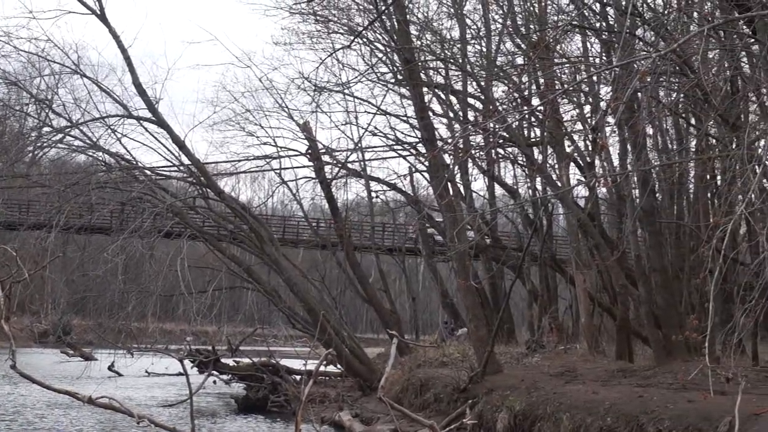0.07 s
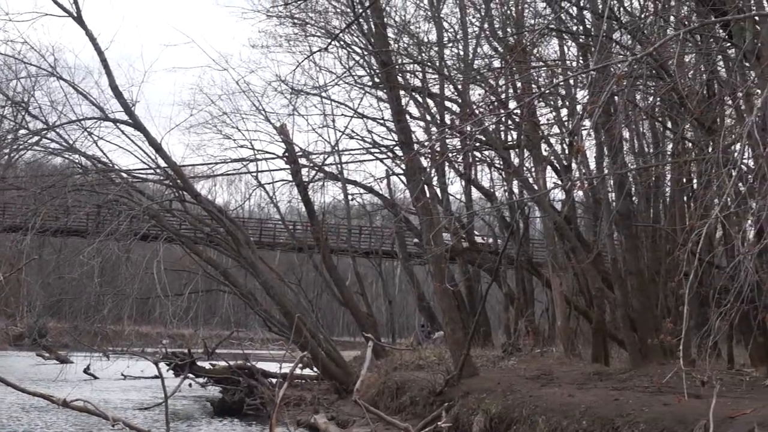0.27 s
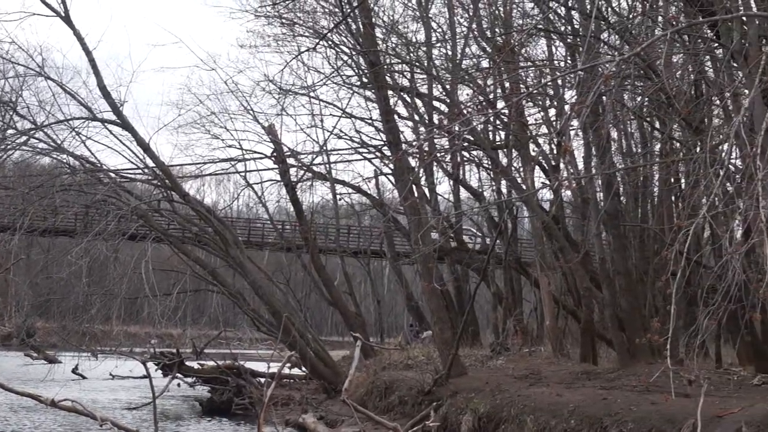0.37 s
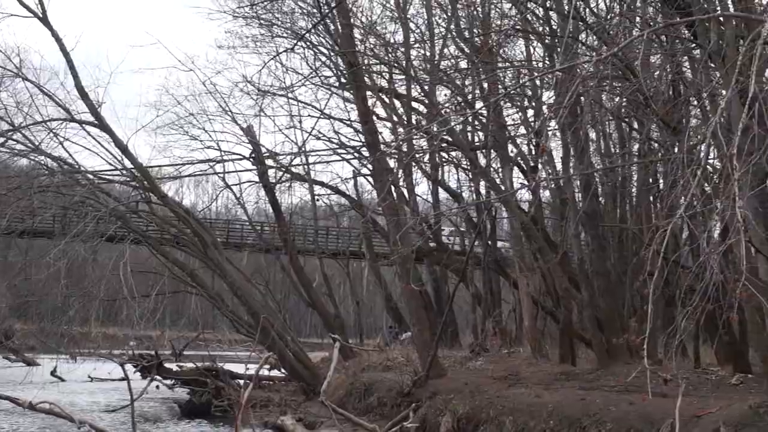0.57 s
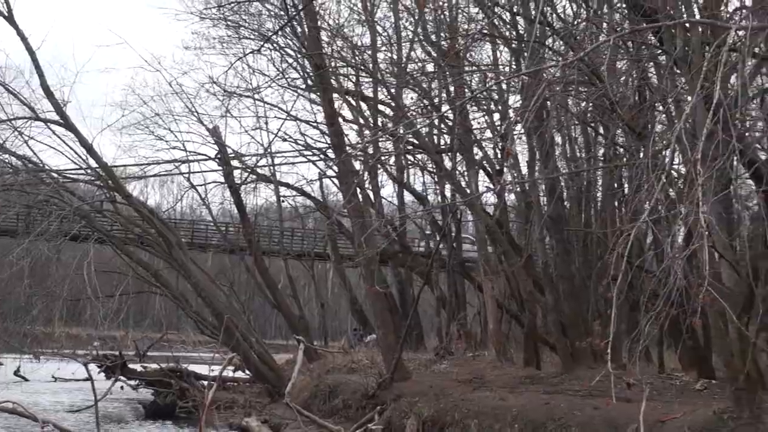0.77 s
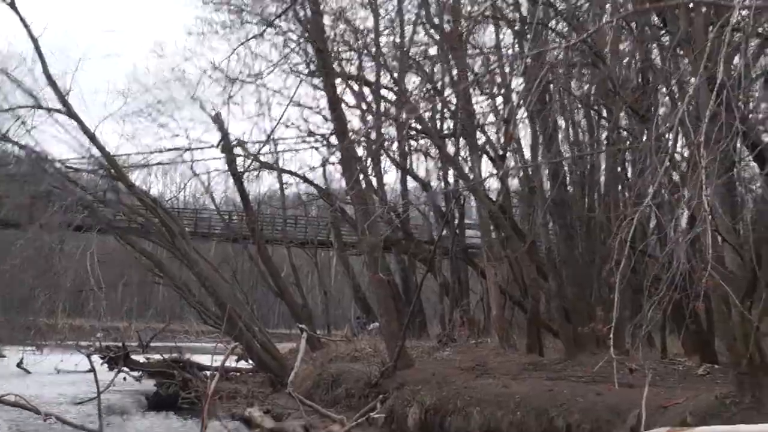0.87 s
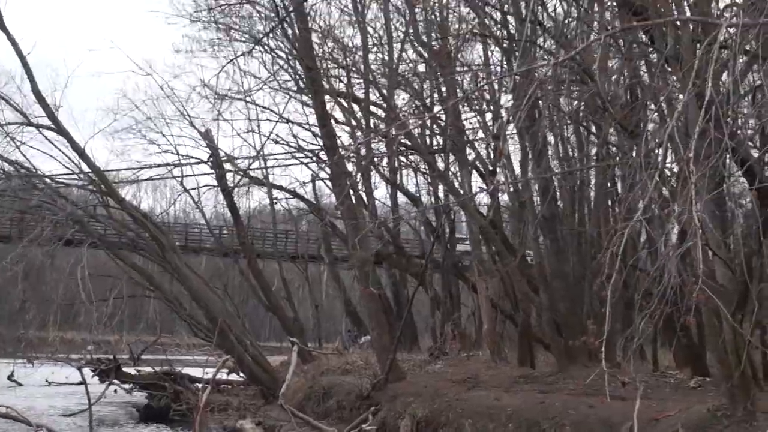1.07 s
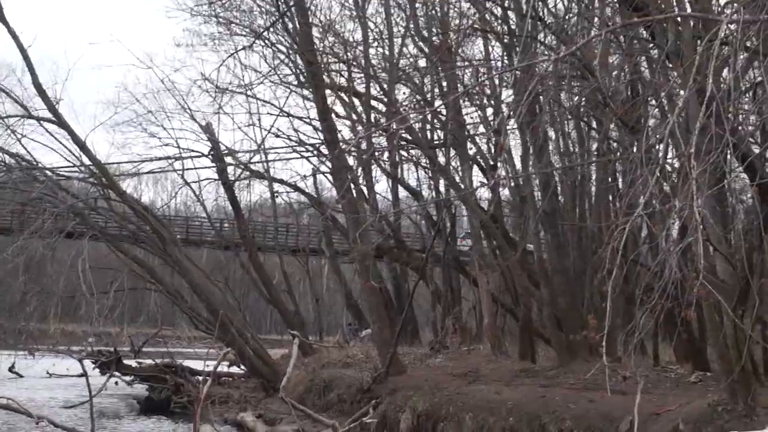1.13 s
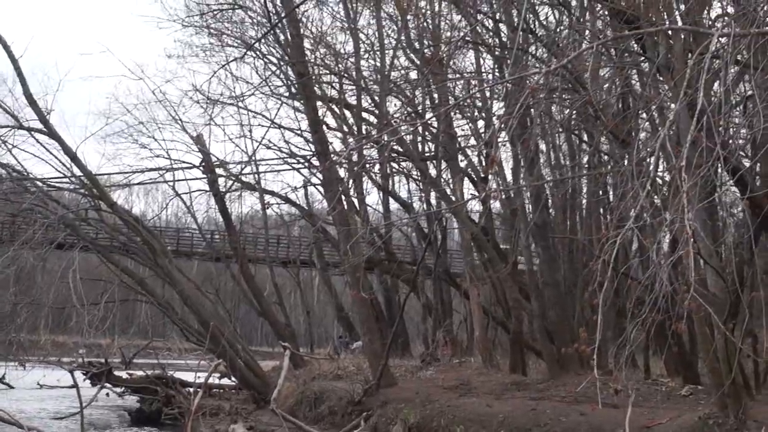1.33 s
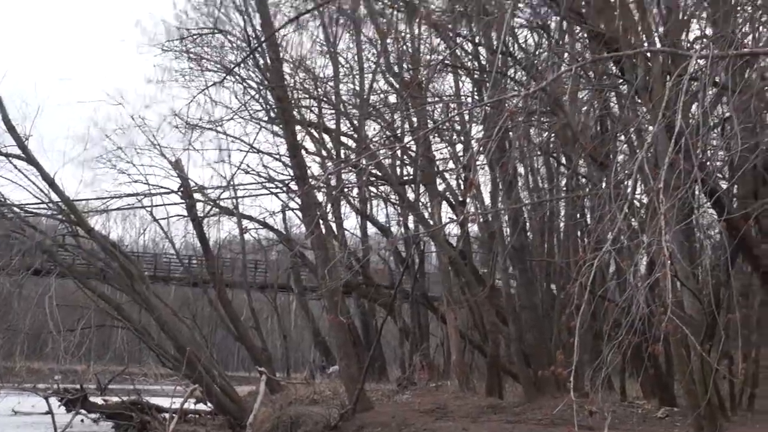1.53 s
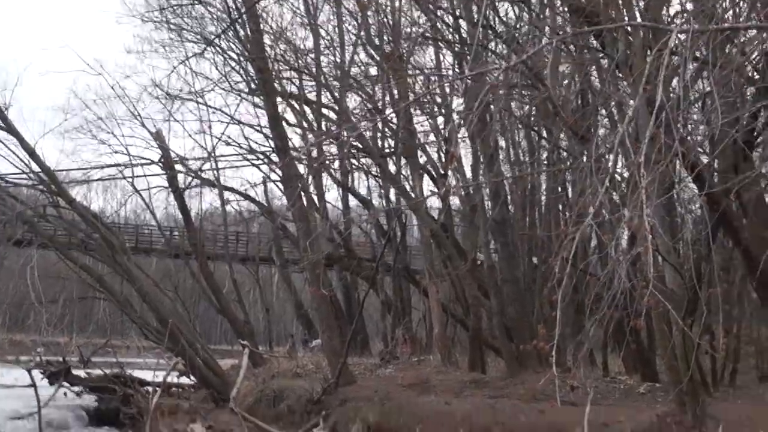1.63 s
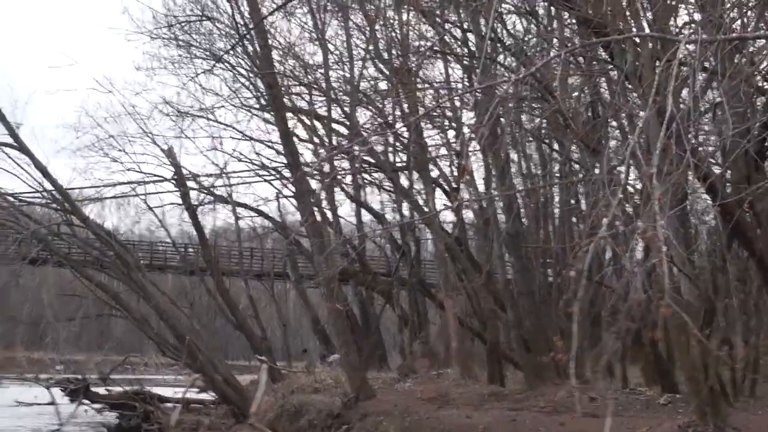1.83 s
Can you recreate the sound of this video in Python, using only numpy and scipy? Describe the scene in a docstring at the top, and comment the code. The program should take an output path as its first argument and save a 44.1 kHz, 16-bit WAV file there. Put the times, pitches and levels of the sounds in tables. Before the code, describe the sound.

Dry wood clacks and cracks at irregular moments on a river bank. A soft scraping rustle with a few dull scuffs swells between the knocks, while the river rushes faintly and steadily in the background.

```python
"""Dry wood clacks and knocks at irregular moments on a river bank near a footbridge.
Each impact gives a contact ping and a splintery crack, and excites damped normal modes:
the high ones ring briefly, the low ones of the body thump. Between the clacks a soft scraping
rustle swells, with a few dull scuffs. Behind them the river rushes as steady broadband noise."""
import sys
import numpy as np
from scipy import signal
from scipy.fft import rfft, irfft
from scipy.io import wavfile
from scipy.ndimage import uniform_filter1d

SR = 44100
rng = np.random.default_rng(int(sys.argv[2]) if len(sys.argv) > 2 else 0)


def dump(signal):
    """Clip the signal to [-1, 1] and save it as 16-bit WAV at the path in sys.argv[1]."""
    limited = np.clip(np.atleast_2d(signal).T, -1, 1)
    pcm = np.round(limited * 32767).astype(np.int16)
    wavfile.write(sys.argv[1], SR, pcm)


N = 83790

# Noise spectra of the background (f/Hz, relative spectral density/dB)
RIVER_SPECTRUM = [(30, -48), (60, -48), (100, -29), (160, -20), (250, -10.5), (370, -12.5), (480, -1),
                  (600, -2.5), (780, -6.5), (1030, -0.5), (1350, -8), (2000, -13), (3000, -19), (4500, -21),
                  (7000, -25.5), (11000, -31)]
RUSTLE_SPECTRUM = [(30, -64), (100, -47), (165, -35), (240, -27), (350, -20.5), (500, -4), (620, -4),
                   (780, -5.5), (1030, 0), (1300, -8.5), (1800, -12.5), (2300, -19.5), (3300, -24),
                   (5500, -43), (8400, -41), (11000, -54)]
GRIT_SPECTRUM = [(200, -15.5), (1200, 17), (2000, -13), (4000, -3), (7000, -20), (11000, -27)]
BUMP_SPECTRUM = [(30, -34), (60, -28), (120, -12), (240, 14), (400, -4), (1000, -45)]
HISS_SPECTRUM = [(400, -30), (1500, -3), (2500, -0.5), (4000, -3), (7000, -19), (11000, -26)]
# Noise independent in each channel, relative to noise common to both (f/Hz, level/dB)
RIVER_INCOHERENCE = [(50, 0), (200, -19), (500, -4), (1100, -19.5), (2200, 1), (4500, 12), (11000, 7)]
RUSTLE_INCOHERENCE = [(50, -4), (200, -14), (500, -18), (1100, -17), (2200, -11), (4500, 4), (11000, 4)]
# Amplitude envelopes (t/s, level/dB)
RIVER_ENVELOPE = [(0, -50), (.3, -51.5), (.5, -51.5), (1.9, -52.5)]
RUSTLE_ENVELOPE = [(0, -57), (.71, -74), (.735, -42), (.755, -43.5), (.80, -42.5), (.86, -41.5), (.93, -46),
                   (1.0, -43.5), (1.025, -42.5), (1.06, -45.5), (1.11, -48), (1.17, -39), (1.24, -41),
                   (1.32, -45), (1.41, -43), (1.48, -45.5), (1.62, -43.5), (1.73, -52), (1.79, -49),
                   (1.9, -56.5)]
# Scuffs (t/s, half-width at 1/e amplitude/s, bump level/dB, hiss level/dB)
SCUFF_EVENTS = [(0.239, 0.044, -73, -68), (0.794, 0.047, -62.5, -53.5), (1.028, 0.016, -62, -52),
                (1.19, 0.069, -60.5, -58.5)]
# Impacts on the wood (t/s, contact f/Hz, contact decay to 1/e in cycles, contact gain/dB,
# ring gain/dB, thump gain/dB, crack gain/dB, snap gain/dB, left minus right/dB)
IMPACTS = [ (.2100, 2150, 2.2, -16.5, -12.5, -23.5, -19.5, -37.5, 1),
           (0.5793, 5130, 13, -27, -47, -60, -47, -32.5, 2),
           (.5800, 1770, 1.55, -6, -33, -42.5, -28.5, -28, 0.5),
           (0.5827, 1180, 1.24, -13, -39, -73, -30, -52, -1.5),
           (.6020, 1650, 1.9, -16, -44, -43, -33, -39, 0),
           (0.606, 1970, 1.4, -30, -43.5, -47, -56, -34.5, 5),
           (.7010, 5470, 1.0, -52, -63, -66, -52, -45, 13),
           (.7700, 1290, 1.7, -12.5, -56, -38, -40, -34, -7),
           (0.7713, 2690, 3.8, -15.5, -40, -63, -23.5, -27, 4.5),
           (0.7721, 1433, 3.3, -13, -16, -28, -16, -23.5, 1),
           (.7810, 1020, 2.9, -49, -36, -53, -34, -48, -8),
           (0.9127, 1680, 1.1, -21, -50, -66, -35, -29.5, 0.5),
           (0.945, 3280, 6.1, -36.5, -35, -69, -36, -44, 2.5),
           (0.9745, 1320, 1.96, -15.5, -37, -37, -37, -45, -1),
           (0.9874, 3240, 7.3, -34, -34, -73, -47, -43, 5.5),
           (1.019, 1690, 6.2, -31, -44, -55, -38, -48, 3.5),
           (1.4679, 2300, 0.5, -8, -40.5, -71, -25.5, -52, 3),
           (1.527, 2550, 3.76, -13.5, -24, -34, -35, -38, 2),
           (1.5539, 1680, 3.7, -31, -43, -68, -39, -53, 0.5),
           (1.5650, 2410, 3.6, -31.5, -41, -52, -43, -48, 5),
           (1.5943, 1146, 3.4, -25, -41, -33.5, -39, -47, -1),
           (1.6187, 4830, 3.4, -24, -58, -55, -59, -37, 7),
           (1.6197, 1210, 1.4, -12.5, -33.5, -31, -25, -29.5, 1.5),
           (1.6440, 1280, 1.6, -26, -28.5, -40, -35, -53, 0.5),
           (1.7070, 2040, 1.08, -22, -50, -51, -39, -47.5, 2),
           (1.7709, 2690, 2, -38.5, -42.5, -74, -49, -52.5, 8.5),
           (1.813, 1220, 1.5, -42.5, -47, -37, -48, -59, 11)]
# Normal modes of the wood, high ring and low body (f/Hz, relative level/dB, T60/s)
RING_MODES = [(1050, 1.5, 0.047), (1230, -28, 0.015), (1302, 0.5, 0.025), (1590, 1, 0.017),
              (2020, -20.5, 0.065), (2285, -9.5, 0.024), (2580, -38, 0.02)]
BODY_MODES = [(335.6, -1.5, 0.057), (371.6, -5, 0.063), (494, 1, 0.052), (577, 0.5, 0.026)]
# Spectra of the crack and its brighter snap (f/Hz, relative spectral density/dB)
CRACK_SPECTRUM = [(40, -19), (200, -14.5), (500, -16), (760, -16), (1100, 11), (2000, -1), (2700, 5.5),
                  (3150, -11), (3600, -1.5), (4100, -10.5), (4700, -5), (5500, -15), (11000, -37)]
SNAP_SPECTRUM = [(500, -25), (3000, -11), (4200, 1), (4700, 5.5), (5250, -5), (5650, 4.5), (6300, -5.5),
                 (6900, -2), (7700, -4), (8400, -5), (9200, -4), (10500, -7), (12000, -4)]
# Stereo widening (f/Hz, phase lead of right/rad, left minus right/dB)
STEREO_WIDENING = [(50, 0.34, -1), (200, 0.96, 1.0), (484, 0.94, 1.5), (930, 1.766, 2), (1930, 1.53, 5),
                   (3900, 1.91, 4), (7000, 2.03, 4), (10900, 1.9, 2.5)]


def undb(db):
    """Amplitude ratio of a level in decibels."""
    return 10 ** (np.asarray(db) / 20)


def unit(x):
    """Normalisation to unit rms."""
    return x / np.sqrt(np.mean(x ** 2))


def over_hz(table, column=1):
    """Interpolation of a column over log frequency, at every spectral bin."""
    table = np.array(table, float)
    hz = np.maximum(np.fft.rfftfreq(N, 1 / SR), 1)
    return np.interp(np.log(hz), np.log(table[:, 0]), table[:, column])


def colour(x, spectrum):
    """Spectral shaping that conserves the power of white noise."""
    return irfft(rfft(x) * unit(undb(over_hz(spectrum))), N)


def envelope(table):
    """Gain from levels interpolated linearly in time."""
    return undb(np.interp(np.arange(N) / SR, *np.array(table).T))


def drift(rate_hz):
    """Smoothed random steps: a slow fluctuation with a spread near 1."""
    hold = max(int(SR / rate_hz), 2)
    steps = rng.standard_normal(N)[np.arange(N) // hold]
    return 1.6 * uniform_filter1d(uniform_filter1d(steps, hold), hold)


def stereo_noise(spectrum, incoherence):
    """Partial coherence: common and independent noise add in power."""
    apart = undb(over_hz(incoherence))
    noise = rfft(rng.standard_normal((3, N)))
    mixed = (noise[0] + apart * noise[1:]) / np.hypot(1, apart)
    return colour(irfft(mixed, N), spectrum)


def river():
    """Rushing water radiates nearly stationary broadband noise."""
    return stereo_noise(RIVER_SPECTRUM, RIVER_INCOHERENCE) * envelope(RIVER_ENVELOPE)


def rustle(flicker_db=1.14, grains_per_s=560, grit_db=-15.5, scatter_db=5.5):
    """Scraping is amplitude-modulated noise, with a Poisson train of impulses for its fine grit."""
    scrape = stereo_noise(RUSTLE_SPECTRUM, RUSTLE_INCOHERENCE) * undb(flicker_db * drift(rate_hz=120))
    onsets = rng.random(N) < grains_per_s / SR
    grains = onsets * undb(scatter_db * rng.standard_normal(N)) * rng.standard_normal((2, N))
    grit = undb(grit_db) * unit(colour(grains, GRIT_SPECTRUM))
    return (scrape + grit) * envelope(RUSTLE_ENVELOPE)


def scuffs():
    """Two noise bands, a dull bump and a dry hiss, swell under a Gaussian envelope at each scuff."""
    t = np.arange(N) / SR
    bump = stereo_noise(BUMP_SPECTRUM, RUSTLE_INCOHERENCE)
    hiss = stereo_noise(HISS_SPECTRUM, RUSTLE_INCOHERENCE)
    return sum(np.exp(-((t - at) / width) ** 2) * (undb(bump_db) * bump + undb(hiss_db) * hiss)
               for at, width, bump_db, hiss_db in SCUFF_EVENTS)


def transient(t, rise_s, decay_s):
    """Exponential build-up and decay, each with its own time constant."""
    return (1 - np.exp(-t / rise_s)) * np.exp(-t / decay_s)


def modes(t, table, detune, rise_s):
    """Free vibration after an impact is a sum of damped sinusoids, one for each normal mode."""
    return sum(undb(db) * transient(t, rise_s, t60 / np.log(1000)) * np.sin(2 * np.pi * hz * ratio * t)
               for (hz, db, t60), ratio in zip(table, detune))


def low_cut(x, cutoff_hz, order):
    """High-pass filtering keeps the clacks dry and free of boom."""
    return signal.sosfilt(signal.butter(order, cutoff_hz, "high", fs=SR, output="sos"), x)


def splinters(bursts, spectrum):
    """A crack is a dense train of tiny random impulses, partly coherent between the channels."""
    common = np.sign(rng.standard_normal(N))
    independent = np.sign(rng.standard_normal((2, N)))
    return colour(bursts * unit(common + independent), spectrum)


def clacks(detune_spread=0.0048, body_lag_s=0.00081, tail_db=-22.5):
    """Impact excitation: each contact pings, cracks and snaps, and sets the wood's modes vibrating."""
    wood, thumps, cracks, snaps = np.zeros((4, 2, N))
    detunes = 1 + detune_spread * rng.standard_normal((len(IMPACTS), 16))
    for impact, detune in zip(IMPACTS, detunes):
        at, hz, cycles, contact_db, ring_db, thump_db, crack_db, snap_db, pan_db = impact
        span = slice(int(at * SR) + 1, min(int(at * SR) + SR // 8, N))
        t = np.arange(N)[span] / SR - at
        pan = undb(np.array([[pan_db], [-pan_db]]) / 2)
        ping = transient(t, rise_s=0.00025, decay_s=cycles / hz) * np.sin(2 * np.pi * hz * t)
        ring = modes(t, RING_MODES, detune, rise_s=0.00097)
        thump = modes(np.maximum(t - body_lag_s, 0), BODY_MODES, detune[::-1], rise_s=0.0037)
        burst = transient(t, rise_s=0.00035, decay_s=0.0012)
        burst += undb(tail_db) * transient(t, rise_s=0.00035, decay_s=0.0095)
        wood[:, span] += pan * (undb(contact_db) * ping + undb(ring_db) * ring)
        thumps[:, span] += undb(thump_db) * thump
        cracks[:, span] += pan * undb(crack_db) * burst
        snaps[:, span] += pan * undb(snap_db) * burst
    tones = low_cut(wood, cutoff_hz=840, order=4) + low_cut(thumps, cutoff_hz=178, order=2)
    return tones + splinters(cracks, CRACK_SPECTRUM) + splinters(snaps, SNAP_SPECTRUM)


def scene():
    """Linear superposition: the sound pressures of the sources add."""
    return clacks() + river() + rustle() + scuffs()


def record(dry, cutoff_hz=11050):
    """Stereo widening: the right leads in phase, the left is slightly louder. The top treble is cut."""
    side = np.array([[1], [-1]]) / 2
    phase, level_db = over_hz(STEREO_WIDENING, column=1), over_hz(STEREO_WIDENING, column=2)
    widening = undb(side * level_db) * np.exp(-1j * side * phase)
    low_pass = signal.ellip(8, .2, 70, cutoff_hz, fs=SR, output="sos")
    return signal.sosfilt(low_pass, irfft(rfft(dry) * widening, N))


dry = scene()
out = record(dry)
dump(out)
```